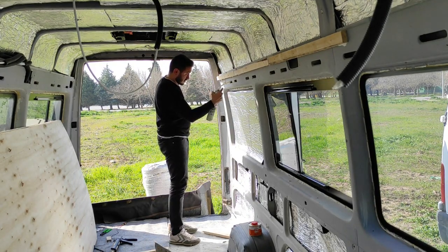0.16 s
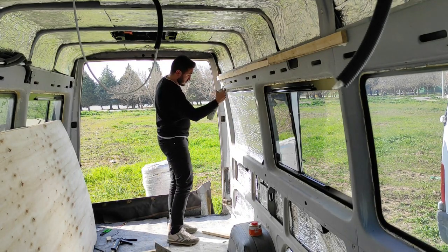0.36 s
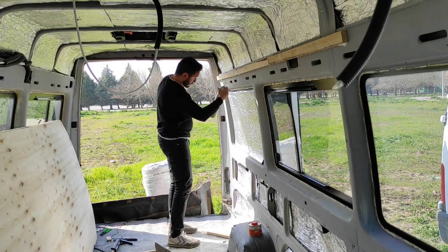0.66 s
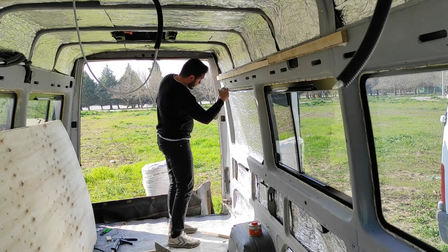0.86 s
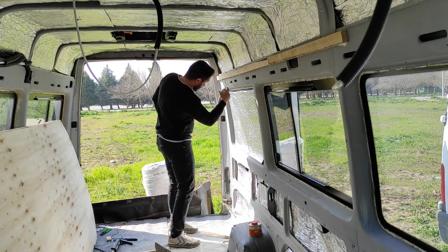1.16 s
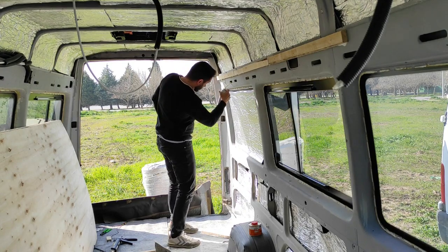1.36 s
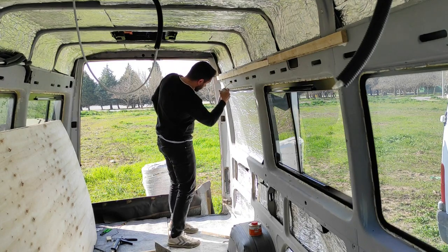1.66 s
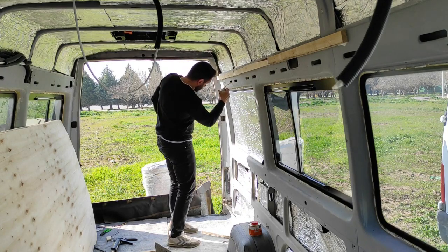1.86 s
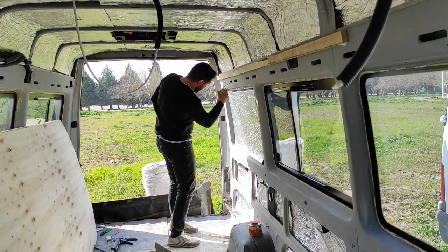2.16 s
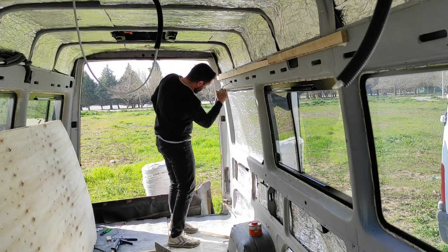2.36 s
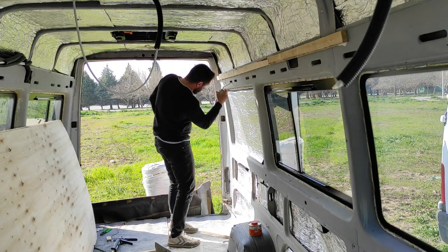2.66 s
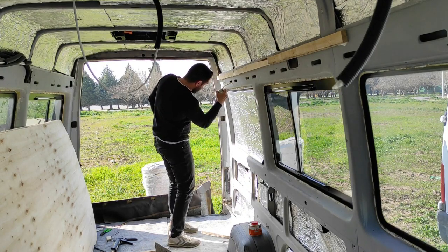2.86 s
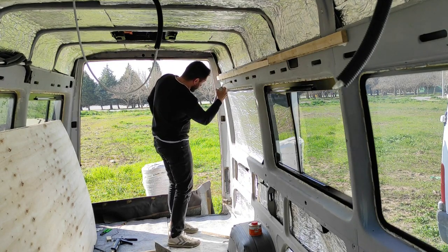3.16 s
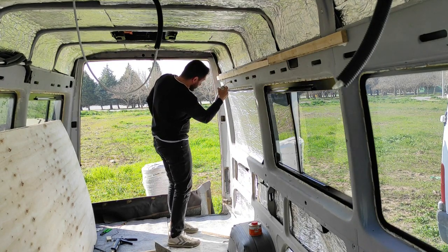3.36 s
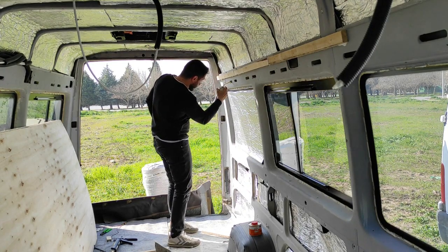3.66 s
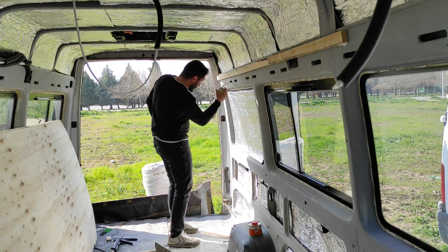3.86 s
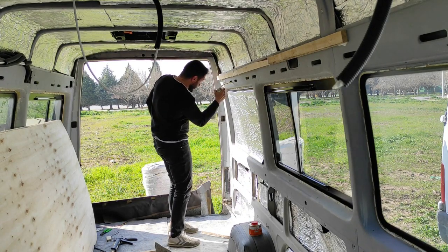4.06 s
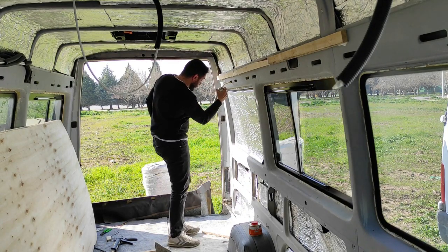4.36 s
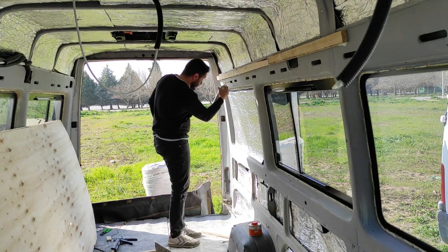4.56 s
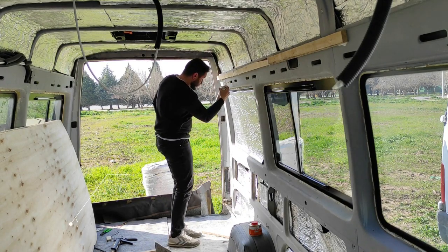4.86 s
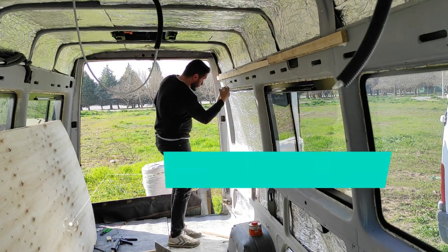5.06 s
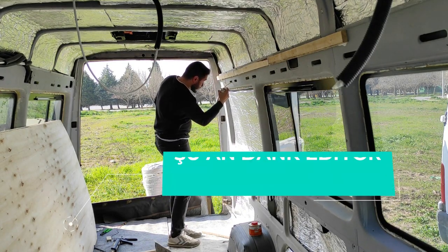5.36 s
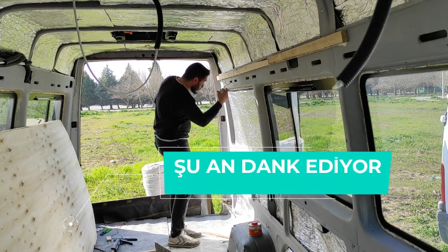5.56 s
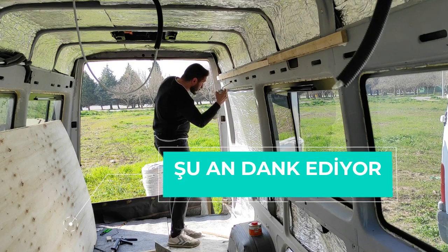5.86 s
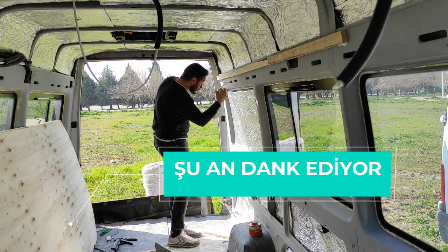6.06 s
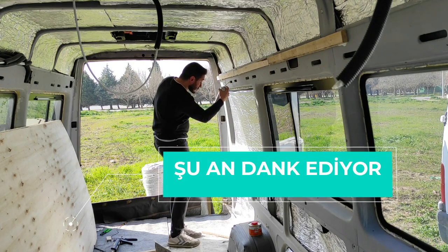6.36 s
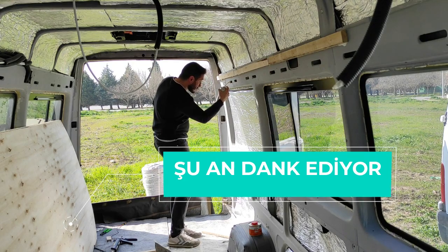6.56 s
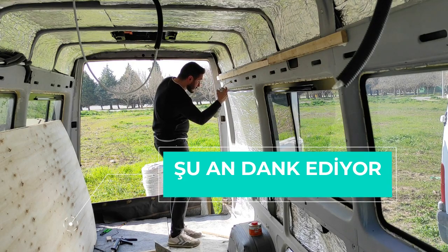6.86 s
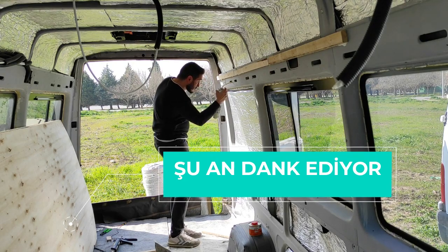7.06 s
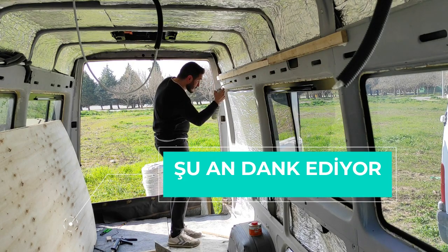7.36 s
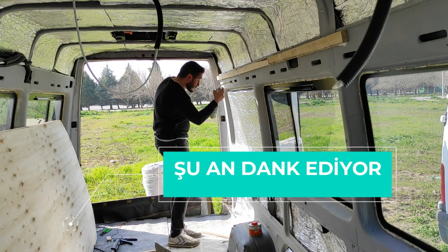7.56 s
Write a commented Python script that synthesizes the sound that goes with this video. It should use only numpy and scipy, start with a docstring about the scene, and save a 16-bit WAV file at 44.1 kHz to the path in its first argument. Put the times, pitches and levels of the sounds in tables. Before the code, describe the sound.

Close in a bare metal van, a pressurised foam can gives a quick spurt, a longer bright hiss of about half a second, then another short burst. Pressure fades into brief wet squirts, crackling spatter and hollow bubble blips, with weak fizz between. Later spits come in clusters, coarse and splattery. Stereo microphone, bright whistly treble, short metallic reflections, faint low outdoor rumble.

```python
"""Expanding foam sprayed into a van wall

A can of foam is emptied into the wall cavity of a bare van: propellant, as coloured noise, hisses in
three sprays; then squirts and wet sputter go on over a weaker hiss as the can runs low.
Random pops make spatter and gurgle; gobs, gliding bubble notes and low belches come at set times.
Foam noise rings the van's modes and empty cargo space; rumble and hum come in by the open doors,
and the rumble swells in a thump at 4.66 s as a foot shifts."""
import sys
import numpy as np
from scipy import signal
from scipy.fft import rfft, irfft, next_fast_len
from scipy.io import wavfile
from scipy.ndimage import uniform_filter1d, map_coordinates

SR = 44100
rng = np.random.default_rng(int(sys.argv[2]) if len(sys.argv) > 2 else 0)


def wrap_up_sound(samples):
    """Save the sound to the file named by the first command line argument, as 16-bit audio."""
    columns = np.atleast_2d(samples).T
    # keep every value between -1 and 1, then stretch to whole-number steps
    tamed = np.clip(columns, -1, 1)
    steps = np.round(tamed * 32767).astype(np.int16)
    wavfile.write(sys.argv[1], SR, steps)


N = 339553

# All table levels are relative: each source sets its own gain.
# Valve held open: t/s, length/s, gas hiss level/dB, spatter level/dB, foam gurgle level/dB
SPRAYS = [ (0.0, 0.16, -36, -54.5, -39.5), (0.505, 0.61, -39.5, -59.5, -49.5),
          (1.37, 0.12, -43, -54.5, -42.5), ]
# Slugs of foam and gas forced through the straw: t/s, length/s, gas hiss level/dB, spatter level/dB,
# foam gurgle level/dB
SQUIRTS = [ (0.475, 0.02, -54.5, -69, -55), (0.509, 0.005, -50, -45.5, -41),
           (0.755, 0.021, -37.5, -56, -36), (0.85, 0.027, -41.5, -67, -43), (1.142, 0.04, -47, -44, -40.5),
           (1.42, 0.018, -62, -57, -37.5), (1.495, 0.039, -54, -51.5, -38), (1.715, 0.041, -71, -85, -54),
           (1.955, 0.054, -56, -82, -52), (2.018, 0.014, -51.5, -58, -45),
           (2.205, 0.024, -45.5, -59.5, -42), (2.28, 0.031, -60.5, -74, -51.5),
           (2.61, 0.042, -68, -68, -56), (2.798, 0.0057, -49.5, -59.5, -43),
           (2.908, 0.043, -44.5, -49.5, -37.5), (3.748, 0.014, -53.5, -60, -44.5),
           (3.87, 0.037, -60, -71, -49), (3.957, 0.054, -50.5, -50, -37), (4.015, 0.045, -42.5, -44, -35.5),
           (4.157, 0.032, -59, -60, -50.5), (4.722, 0.065, -48.5, -55.5, -38),
           (4.835, 0.067, -54, -53, -39), (4.91, 0.015, -48, -50, -38), (4.995, 0.015, -59.5, -66, -48.5),
           (5.748, 0.03, -45, -40.5, -35.5), (6.208, 0.026, -51, -40.5, -34),
           (6.265, 0.047, -57, -58, -41.5), (6.352, 0.022, -47.5, -53.5, -38),
           (6.405, 0.025, -57, -55.5, -43), (6.742, 0.0054, -72, -54.5, -51),
           (6.997, 0.04, -52.5, -43, -35.5), (7.06, 0.059, -54, -51, -38), (7.165, 0.028, -62, -63, -47),
           (7.555, 0.017, -88, -75, -61), ]
# Leak from the straw in between: t/s, gas hiss level/dB, spatter level/dB, foam gurgle level/dB
OOZE = [(0.26, -80, -75.5, -63), (0.43, -72, -75, -68), (0.6, -72, -80, -80), (1.29, -86, -80, -67),
        (1.61, -68, -65, -53), (1.76, -64.5, -66.5, -61), (2.45, -64, -67.5, -63.5),
        (3.15, -62, -66.5, -60), (3.48, -65, -65.5, -56), (3.62, -64.5, -66, -59), (4.3, -62, -65, -57.5),
        (4.5, -64, -64.5, -58), (4.7, -63, -63, -45.5), (5.15, -63.5, -64, -56.5),
        (5.55, -62.5, -63.5, -48), (5.92, -60.5, -60, -48.5), (6.55, -63.5, -63, -49.5),
        (7.22, -59.5, -59, -45.5), (7.68, -65, -59, -42)]
# Gobs of foam spat out: t/s, peak level/dB, gas puff level/dB, length/s
GOBS = [(0.5, -26.5, -39, 0.014), (1.337, -41, -76, 0.038), (2.191, -49, -65, 0.013),
        (3.741, -39, -66, 0.022), (4.713, -33, -52, 0.014), (4.87, -38, -53.5, 0.038),
        (4.916, -32.5, -52, 0.015), (5.695, -33.5, -54, 0.078), (5.744, -33, -57, 0.016),
        (6.166, -33, -45.5, 0.053), (6.216, -30.5, -56, 0.025), (6.74, -36.5, -68, 0.021),
        (6.957, -33.5, -60, 0.027), (6.974, -33, -43.5, 0.095), (7.284, -35, -60, 0.013)]
# Large bubbles swelling at the straw: t/s, peak level/dB, start f/Hz, life/s
GLUGS = [(0.215, -35, 1150, 0.013), (0.228, -45.5, 328.4, 0.07), (0.708, -31, 1250, 0.026),
         (0.755, -44, 1230, 0.0077), (0.849, -29, 1258, 0.038), (0.882, -32, 1033, 0.011),
         (1.023, -28, 1233, 0.024), (1.087, -29, 1158, 0.024), (1.162, -26.5, 891, 0.026),
         (1.222, -45, 339, 0.049), (1.42, -22.5, 1300, 0.013), (1.432, -40, 446, 0.026),
         (1.813, -31, 1182, 0.019), (2.012, -34, 1277, 0.016), (2.592, -45, 890, 0.018),
         (3.473, -35, 1200, 0.0095), (3.742, -34, 1250, 0.019), (3.944, -31, 1242, 0.026),
         (4.132, -35, 980, 0.01)]
# Big gas pockets venting deep in the cavity: t/s, peak level/dB, centre f/Hz, length/s
BELCHES = [(0.564, -58, 277, 0.03), (0.933, -56, 282, 0.058), (1.176, -41, 256, 0.034),
           (1.574, -49, 325, 0.069), (1.628, -45, 423, 0.033), (1.827, -45, 250, 0.019),
           (2.608, -44, 258, 0.026), (2.669, -52, 273, 0.039), (2.753, -52.5, 415, 0.088),
           (4.724, -42.5, 470, 0.068), (4.769, -45.5, 290, 0.058), (4.79, -53, 164, 0.13),
           (4.868, -47, 290, 0.06), (4.92, -41, 190, 0.038)]

# Source colours: f/Hz, spectral level/dB
JET_COLOUR = [(600, -1.5), (1800, -1), (2500, -10.5), (2900, 2.5), (3900, -1.5), (5500, 1), (9000, 1),
              (10500, -6.5), (12500, -8.5), (15000, -14)]
SPATTER_COLOUR = [(300, -24), (900, 8), (1220, 2.5), (1500, -2), (1800, 0), (2100, 5), (2600, 2.5),
                  (3200, -2), (3900, -9.5), (6000, -11), (10000, -26.5), (15000, -74)]
FIZZ_COLOUR = [(300, -12), (900, -14), (1550, -3.5), (2000, 0), (2350, 1), (2620, 4.5), (3050, -3.5),
               (3600, -7.5), (4400, -10), (6000, -14.5), (10000, -44), (15000, -63)]
FOAM_COLOUR = [(90, -45), (160, -22), (280, 1), (500, 2), (850, 8.5), (1250, 6), (1500, -6), (3000, -18),
               (6000, -90)]
OUTSIDE_COLOUR = [(15, -32.5), (24, -4), (32, -15.5), (40, -1), (45, -2.5), (52, -7), (64, -9), (82, -20.5),
                  (105, -14.5), (130, -30.5), (155, -11), (185, -20.5), (260, -20), (440, -82)]

# Resonances of the straw: f/Hz, width/Hz, level/dB
STRAW_MODES = [(7100, 110, 1), (7700, 60, -5), (7680, 70, 4), (8700, 60, -1), (8600, 87, -1)]
# Modes of the van's hollow body: f/Hz, width/Hz, level/dB
BODY_MODES = [(155.4, 7.8, 5.5), (260.5, 16.8, 7.5), (275.3, 19, 7.5), (316.5, 17, 6), (342.7, 9.5, 4.5),
              (415.7, 31, 8), (427.7, 13.6, 6), (464.3, 28, 4.5), (521, 6.8, -3), (555, 22, 1),
              (618.4, 30, 3.5), (713, 25, 1.5), (769, 36, 1.5), (803.6, 17.4, -2), (945.4, 23, -0.5),
              (979, 31, -4), (1158, 16.4, 3.5), (1190, 18, 3.5), (1630, 17, 3)]
# Gain of the cavity's low notes as it fills: t/s, level/dB
HOLLOW_GAIN = [(0, -1), (1.5, 1), (3.4, -2.5), (4.9, 0), (5.7, -1.5), (7.1, -3), (7.7, -6)]
# Low rumble from outdoors, with a thump at 4.66 s as a foot shifts: t/s, level/dB
RUMBLE_LEVEL = [(0, -57), (3, -56), (4.5, -57), (4.66, -49), (4.95, -55.5), (6.7, -53), (7.7, -52)]

# Left-right correlation: f/Hz, correlation (0 to 1)
LIKENESS = [(50, 0.86), (250, 0.9), (600, 0.62), (1200, 0.27), (2500, 0.4), (5000, 0.16), (12000, 0.077)]
# Left minus right, ahead of the port resonances: f/Hz, level/dB
BALANCE = [(40, 4.5), (160, 7.5), (300, 2), (600, 6), (1200, 1), (2500, 1), (4000, -1)]
# Broad air resonance of each microphone port: f/Hz, level/dB
LEFT_PORT = [(3000, 0), (4000, 2.5), (6000, 4), (7000, 5.5), (7600, 15), (8200, 11.5), (8700, 19),
             (9400, 16), (10000, 6.5), (12000, 2), (15000, 4.5)]
RIGHT_PORT = [(2000, 0.34), (2600, 1.7), (3300, 1.3), (4000, 3.3), (6000, 8.5), (7000, 16.4), (7350, 21.6),
              (7950, 19.7), (8900, 9.3), (9400, 7.2), (10000, 2.7), (15000, 2.5)]

SAG_DB_PER_S = 3  # the can loses pressure while it sprays
OPEN_DB_PER_S, SHUT_DB_PER_S = 847, 523  # valve, gas rates
SWELL_DB_PER_S = 2  # a squirt grows as the straw clears
BUILD_DB_PER_S, COLLAPSE_DB_PER_S = 471, 397  # squirt, gas rates
FOAM_LEAD_RATIO, FOAM_LAG_RATIO = 1.27, 1.33  # foam rises and falls this many times slower than gas
STEP_SAMPLES = 32  # between two settings of the flow
HOLLOW_HZ = 328  # upper edge of the cavity's low notes
HUM_MEAN_HZ, HUM_RE_RUMBLE_DB = 45.1, -3.5
TOP_HZ = 15600  # band limit


def amp(db):
    """Decibels to gain."""
    return 10 ** (np.asarray(db) / 20)


def unit(x):
    """Scale to rms 1."""
    return x / np.sqrt(np.mean(np.abs(x) ** 2) + 1e-20)


def along(points, hz):
    """Read (f/Hz, value) points on a log frequency axis."""
    f, v = np.transpose(points)
    return np.interp(np.log(hz + 1), np.log(f + 1), v)


def curves(rows):
    """One value per sample for each column after the time."""
    s, *cols = np.transpose(rows)
    return [np.interp(np.arange(N) / SR, s, c) for c in cols]


def wobble(rate_hz):
    """Smooth random curve, rate_hz knots a second."""
    knots = rng.standard_normal(int(N * rate_hz / SR) + 4)
    return map_coordinates(knots, [np.arange(N) * rate_hz / SR])


def stereo_noise():
    """Two unrelated channels of white noise."""
    return rng.standard_normal((2, N))


def filtered(x, response):
    """Apply a response of frequency."""
    size = next_fast_len(N + SR // 2)
    return irfft(rfft(x, size) * response(np.fft.rfftfreq(size, 1 / SR)), size)[..., :N]


def coloured(x, colour, gain_db=0.0):
    """Apply a colour table and a gain."""
    return filtered(x, lambda hz: amp(along(colour, hz) + gain_db))


def resonance(hz, centre_hz, width_hz):
    """Causal response of one mode."""
    return 1j * hz * width_hz / (centre_hz ** 2 - hz ** 2 + 1j * hz * width_hz)


def spread(pair):
    """Mix two unrelated signals to left and right, correlated per LIKENESS."""
    def mid_side(hz):
        angle = np.arccos(np.clip(along(LIKENESS, hz), -1, 1)) / 2
        return np.array([np.cos(angle), np.sin(angle)])
    mid, side = filtered(pair, mid_side)
    return np.array([mid + side, mid - side])


def pops(rate_hz, scatter_db, rush):
    """Gas pockets of uneven size burst at random over a rush of escaping gas."""
    sizes = (rng.random(N) < rate_hz / SR) * amp(scatter_db * rng.standard_normal(N))
    bursts = unit(sizes * rng.choice([-1, 1], (2, N)))
    return unit(bursts + rush * stereo_noise())


def force(level_db, half_db, range_db):
    """Drive: near 0 while foam only oozes, near 1 when driven hard."""
    return .5 + .5 * np.tanh((level_db - half_db) / range_db)


def flow_db(t, length_s, slope, rise, fall):
    """One push, t seconds in: it rises, holds on a slope and falls, all in dB/s."""
    return rise * np.minimum(t, 0) + slope * np.clip(t, 0, length_s) - fall * np.maximum(t - length_s, 0)


def nozzle():
    """Gas, spatter and gurgle levels in dB: sprays and squirts add their power to the ooze."""
    t = np.arange(0, N, STEP_SAMPLES) / SR
    power = amp([level_db[::STEP_SAMPLES] for level_db in curves(OOZE)]) ** 2
    kinds = [
        (SPRAYS, -SAG_DB_PER_S, OPEN_DB_PER_S, SHUT_DB_PER_S),
        (SQUIRTS, SWELL_DB_PER_S, BUILD_DB_PER_S, COLLAPSE_DB_PER_S),
    ]
    for pushes, slope, rise, fall in kinds:
        for s, length_s, gas_db, spatter_db, gurgle_db in pushes:
            gas = flow_db(t - s, length_s, slope, rise, fall)
            foam = flow_db(t - s, length_s, slope, rise / FOAM_LEAD_RATIO, fall / FOAM_LAG_RATIO)
            power += amp([gas_db + gas, spatter_db + gas, gurgle_db + foam]) ** 2
    return curves(np.column_stack([t, *(10 * np.log10(power))]))


def jet(level_db):
    """Turbulent propellant: lower and upper hiss surge apart; a hard jet makes the straw sing."""
    hiss = unit(coloured(spread(pops(rate_hz=2500, scatter_db=7.0, rush=1.76)), JET_COLOUR))
    lower = filtered(hiss, lambda hz: 1 / (1 + (hz / 6500) ** 8))

    def straw(hz):
        return sum(amp(db) * resonance(hz, centre, width) for centre, width, db in STRAW_MODES)
    singing = unit(filtered(spread(stereo_noise()), straw))
    hard = force(level_db, half_db=-44, range_db=4)
    upper = hiss - lower + amp(-13) * singing * hard
    lower_surge, upper_surge = amp(1.2 * wobble(30)), amp(1.2 * wobble(30))
    flutter_db = 1.2 * wobble(140)
    return (lower * lower_surge + upper * upper_surge) * amp(level_db - 9.0 + flutter_db)


def spatter(level_db):
    """Small bubbles tear at the straw tip; weak flow is a softer fizz around one steady resonance."""
    crackle = unit(coloured(spread(pops(rate_hz=1100, scatter_db=0.0, rush=0.1)), SPATTER_COLOUR))
    fizz = unit(coloured(spread(pops(rate_hz=1300, scatter_db=3.5, rush=0.64)), FIZZ_COLOUR))
    hard = force(level_db, half_db=-61.5, range_db=1.5)
    gain = amp(level_db + 2.0)
    tearing = gain * np.sqrt(hard) * crackle * amp(1.36 * wobble(70))
    seeping = gain * np.sqrt(1 - hard) * fizz * amp(-1.04 + 1.95 * wobble(22))
    tearing = walls(tearing, early_db=2.0, tail_db=-5.5, t60_s=0.068)
    seeping = walls(seeping, early_db=-2.5, tail_db=-0.5, t60_s=0.12, count=30)
    return tearing + seeping


def gurgle(level_db):
    """Large gas pockets burst in clumps inside the cavity, duller when the flow is weak."""
    clump_db = 1.4 * wobble(55)
    bursts = unit(pops(rate_hz=1200, scatter_db=3, rush=0.76) * amp(clump_db))
    dull = filtered(bursts, lambda hz: amp(3.5) / (1 + 1j * hz / 620))
    hard = force(level_db, half_db=-43, range_db=4)
    mix = hard * bursts + (1 - hard) * dull
    return body(mix * amp(level_db - 1.92), direct_db=-9.5)


def gobs():
    """Each gob leaves with a low splutter and a gas puff; forceful ones also crackle."""
    push, tear, gas = np.zeros((3, N))
    for s, db, puff_db, length_s in GOBS:
        u = np.clip((np.arange(N) / SR - s) / max(length_s, .003), 0, 9)
        shape = amp(db) * (1 - np.exp(-14 * u)) * np.exp(-u ** 2)
        push += shape
        gas += shape * amp(puff_db - db)
        tear += shape * force(db, half_db=-29.0, range_db=5.5)
    splutter = body(push * pops(rate_hz=1800, scatter_db=-3.0, rush=0.55), direct_db=1.0)
    crackle = spread(tear * pops(rate_hz=880, scatter_db=-11.0, rush=5.5))
    crackle = coloured(crackle, SPATTER_COLOUR, gain_db=2.5)
    puff = coloured(spread(gas * stereo_noise()), JET_COLOUR, gain_db=-7.5)
    return amp(-6.0) * splutter + crackle + puff


def glugs(fall_lives, end_share, rough):
    """A bubble swells as it leaves the straw, so its note drops quickly."""
    notes, t = np.zeros((2, N + SR)), np.arange(SR // 6) / SR
    for s, db, start_hz, life_s in GLUGS:
        fall = np.exp(-(t / (fall_lives * life_s)) ** 2)
        hz = start_hz * (end_share + (1 - end_share) * fall)
        stagger = unit(uniform_filter1d(rng.standard_normal((2, len(t))), size=60))
        note = np.sin(2 * np.pi * np.cumsum(hz * (1 + rough * stagger), axis=1) / SR)
        envelope = (1 - np.exp(-t / 0.0011)) * np.exp(-(t / life_s) ** 2)
        notes[:, round(s * SR):][:, :len(t)] += amp(db) * note * envelope
    return amp(-18) * body(notes[:, :N], direct_db=-14.5)


def belches(width_share):
    """Each big pocket empties with a short low rumble around its own pitch."""
    out, t = np.zeros(N + SR), np.arange(SR // 4) / SR
    hz = np.fft.rfftfreq(len(t), 1 / SR)
    for s, db, centre_hz, length_s in BELCHES:
        band = resonance(hz, centre_hz, width_share * centre_hz) ** 2
        rumble = unit(irfft(rfft(rng.standard_normal(len(t))) * band, len(t)))
        envelope = (1 - np.exp(-t / 0.005)) * np.exp(-(t / length_s) ** 2)
        out[round(s * SR):][:len(t)] += amp(db) * rumble * envelope
    return out[:N]


def drone(gas_db, level_db):
    """The jet blows across the cavity opening and stirs its lowest mode."""
    centre_hz, width_hz, _ = BODY_MODES[0]
    note = filtered(rng.standard_normal(N), lambda hz: resonance(hz, centre_hz, 2 * width_hz) ** 2)
    return unit(note) * amp(gas_db + level_db)


def body(x, direct_db):
    """Foam noise rings the van's modes, plus a direct share; white noise keeps its level."""
    def response(hz):
        ringing = 0
        for k, (centre_hz, width_hz, db) in enumerate(BODY_MODES):
            # phase lead at one port, lag at the other, alternating by mode
            phase = 2 * np.pi * centre_hz * .00006 * (-1) ** k * np.array([[1], [-1]])
            ringing = ringing + amp(db) * resonance(hz, centre_hz, width_hz) * np.exp(1j * phase)
        ringing = ringing / (1 + (hz / 1600) ** 4) * hz ** 2 / (hz ** 2 + 90 ** 2)
        direct = unit(amp(along(FOAM_COLOUR, hz)))
        return unit(unit(ringing) + amp(direct_db) * direct)
    return filtered(spread(x), response)


def filling(x):
    """Foam in the cavity damps its low notes."""
    low = filtered(x, lambda hz: 1 / (1 + (hz / HOLLOW_HZ) ** 8))
    return x - low + low * amp(curves(HOLLOW_GAIN)[0])


def reflections(early_db, tail_db, t60_s, count=14):
    """Close metal walls comb the sound, differently at each port, and leave a short tail."""
    t = np.arange(SR // 8) / SR
    tail = rng.standard_normal((2, len(t))) * amp(-60 * t / t60_s) * (t > .003)
    answer = amp(tail_db) * tail / np.linalg.norm(tail[0])
    answer[:, 0] = 1  # direct sound
    for side in answer:
        delays = (rng.uniform(.0008, .009, count) * SR).astype(int)
        side[delays] += amp(early_db) * rng.choice([-1, 1], count) / np.sqrt(count)
    return answer / np.linalg.norm(answer[0])


def walls(x, early_db, tail_db, t60_s, count=16):
    """The can moves along the seam, so one pattern of reflections fades into the next."""
    place, heard = np.linspace(0, count - 1, N), np.zeros((2, N + SR))
    for k in range(count):
        near = np.flatnonzero(np.abs(place - k) < 1)
        fade = np.cos((place[near] - k) * np.pi / 2) ** 1.4
        part = signal.fftconvolve(x[:, near] * fade, reflections(early_db, tail_db, t60_s), axes=1)
        heard[:, near[0]:][:, :part.shape[1]] += part
    return heard[:, :N]


def boom(x, level_db, t60_s, edge_hz):
    """The empty cargo space holds on to the low notes: decaying noise tail, low-passed."""
    t = np.arange(SR // 2) / SR
    tail = rng.standard_normal(len(t)) * amp(-60 * t / t60_s) * (1 - np.exp(-t / 0.013))
    held = signal.fftconvolve(x, tail[None] / np.linalg.norm(tail), axes=1)[:, :N]
    return amp(level_db) * filtered(held, lambda hz: 1 / (1 + (hz / edge_hz) ** 4))


def outside():
    """Low noise rumble and a wavering hum by the open doors; both swell in the foot's thump."""
    noise = unit(coloured(spread(stereo_noise()), OUTSIDE_COLOUR))
    hum_hz = HUM_MEAN_HZ + 1.6 * wobble(5.4)
    hum = unit(np.sin(2 * np.pi * np.cumsum(hum_hz) / SR))
    hum_gain = amp(HUM_RE_RUMBLE_DB + 1.8 * wobble(3.2))
    return (noise + hum * hum_gain) * amp(curves(RUMBLE_LEVEL)[0])


def scene():
    """The can inside the van, over the low rumble."""
    gas_db, spatter_db, gurgle_db = nozzle()
    hiss = walls(jet(gas_db), early_db=2.5, tail_db=-3.5, t60_s=0.11, count=26)
    foam = gurgle(gurgle_db) + gobs() + belches(width_share=0.3)
    foam = filling(foam + glugs(fall_lives=1.2, end_share=0.358, rough=0.276))
    cargo_space = boom(foam, level_db=-3, t60_s=0.73, edge_hz=300)
    can = hiss + spatter(spatter_db) + foam
    return can + cargo_space + drone(gas_db, level_db=-18.5) + outside()


def record(dry):
    """Each port lifts a broad treble band; the balance tilts left in the bass; band-limited."""
    def ports(hz):
        lean = amp(along(BALANCE, hz) / 2)
        left, right = amp(along(LEFT_PORT, hz)), amp(along(RIGHT_PORT, hz))
        return np.array([left * lean, right / lean])
    return filtered(filtered(dry, ports), lambda hz: hz < TOP_HZ)


dry = scene()
out = record(dry)
wrap_up_sound(out)
```